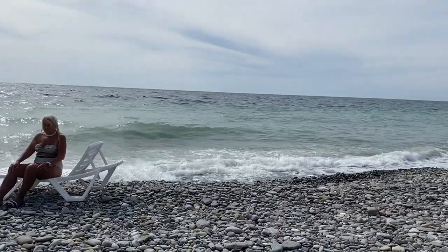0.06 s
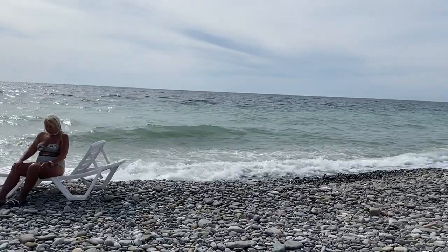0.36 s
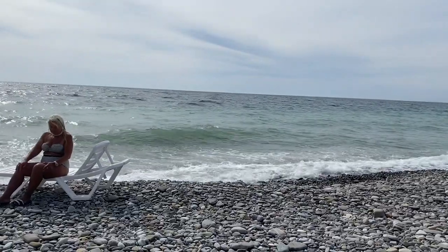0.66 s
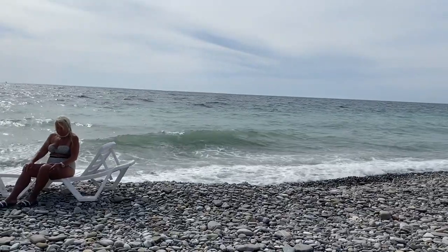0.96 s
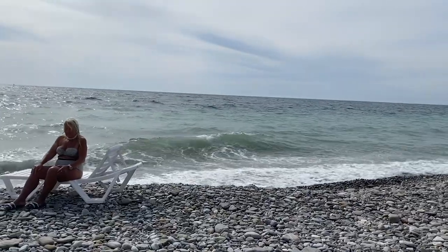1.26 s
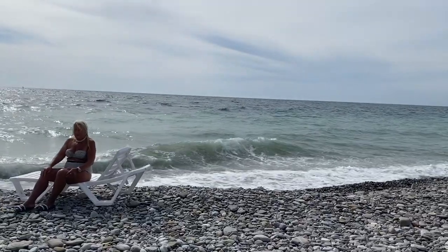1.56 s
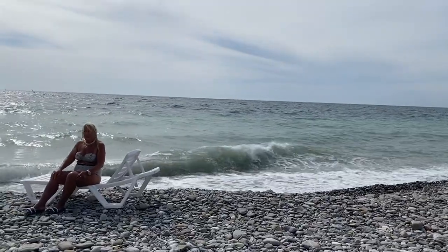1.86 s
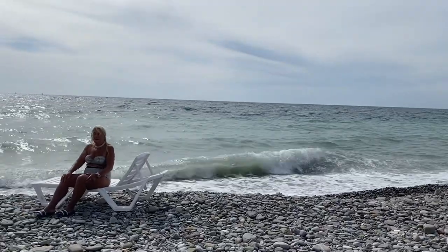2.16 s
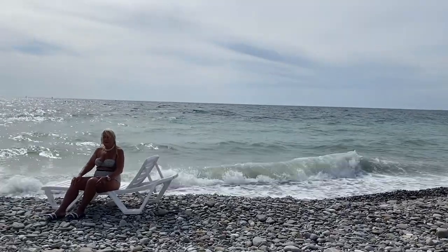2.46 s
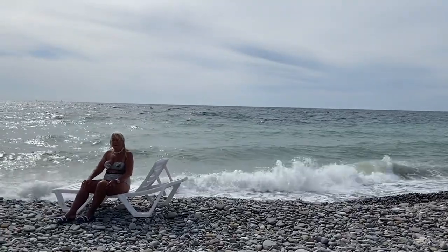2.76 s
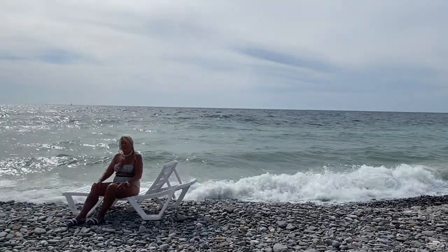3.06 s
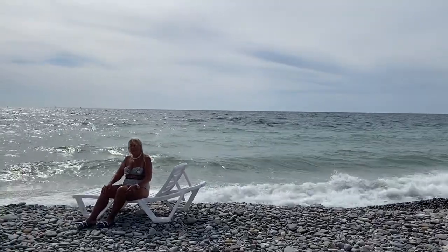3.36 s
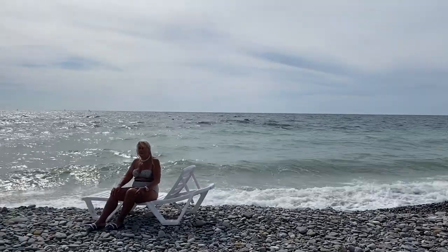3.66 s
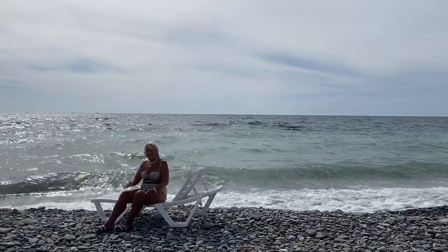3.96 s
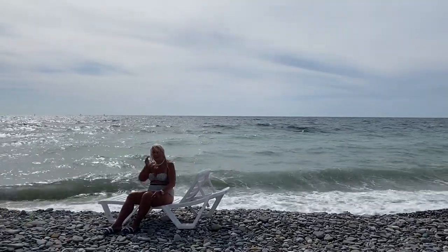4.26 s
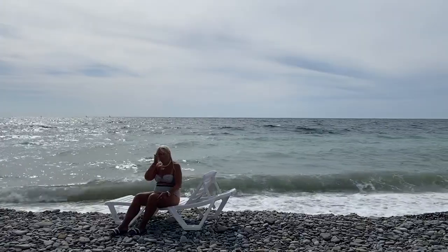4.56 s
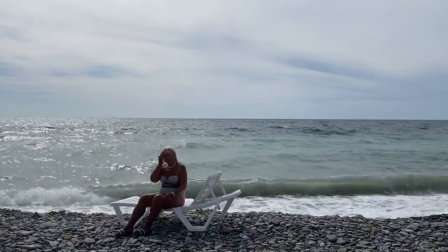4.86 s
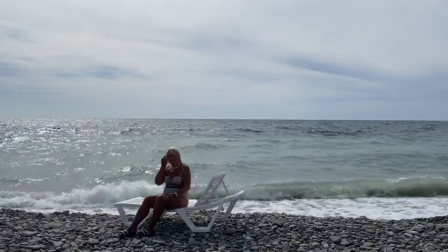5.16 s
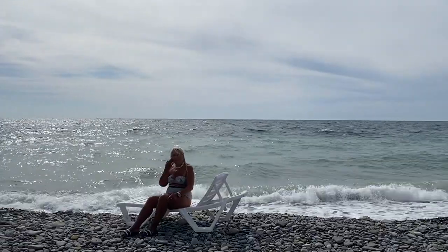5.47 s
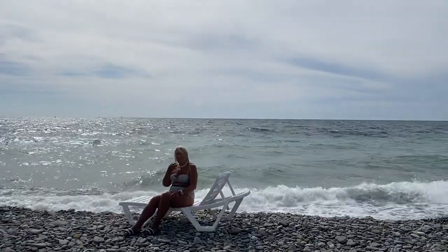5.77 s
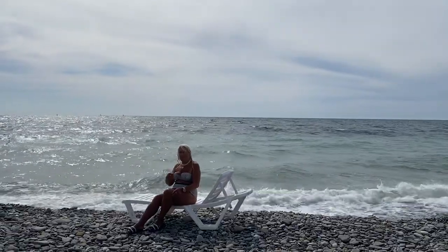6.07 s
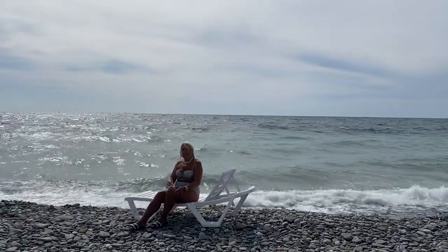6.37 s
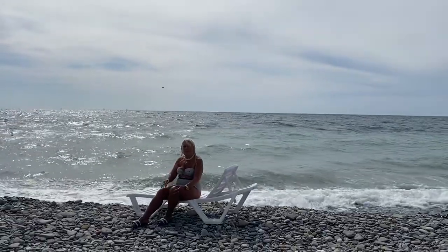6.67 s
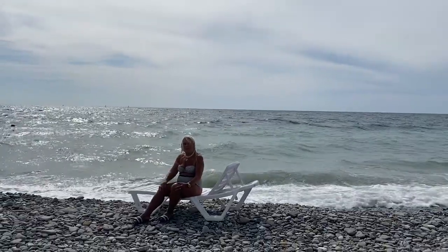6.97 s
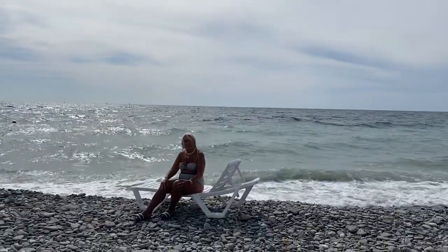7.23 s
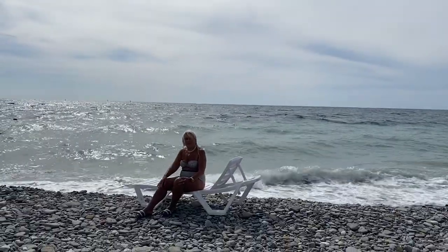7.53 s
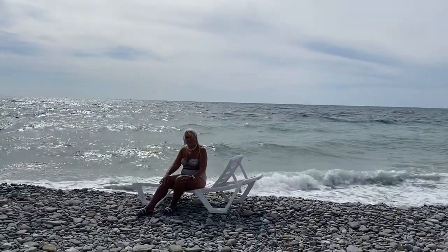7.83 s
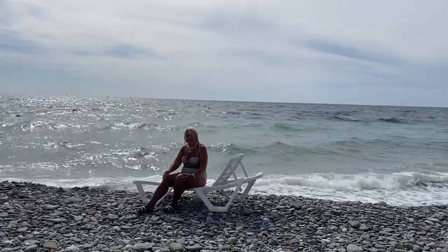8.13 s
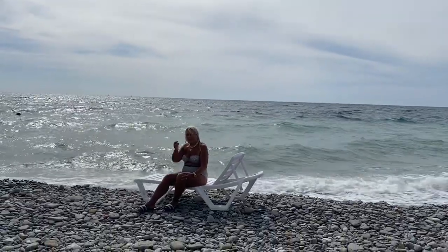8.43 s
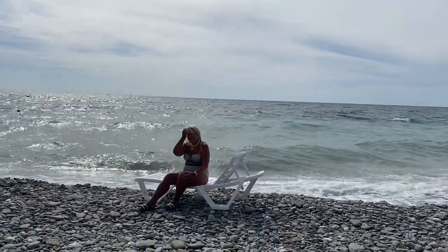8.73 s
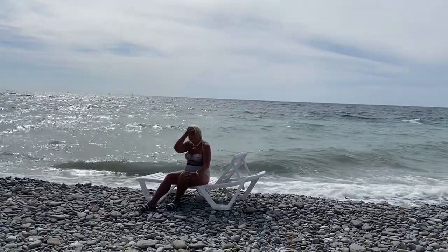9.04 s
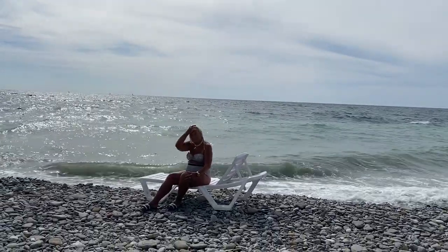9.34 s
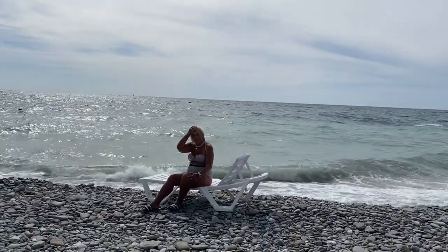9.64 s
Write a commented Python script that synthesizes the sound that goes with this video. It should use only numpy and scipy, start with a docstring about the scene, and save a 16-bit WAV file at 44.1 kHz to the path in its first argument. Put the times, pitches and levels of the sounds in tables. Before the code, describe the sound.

Wind buffets the microphone in uneven gusts as nearby surf surges up a stony shore, foam fizzing and pebbles clicking.

```python
"""Pebble beach in gusty wind

Small waves break a few metres away. Each breaker roars with bubbles, washes up the stones
and fizzes out as foam while pebbles click in the swash. Wind buffets the two microphone
ports: a steady rumble, lumpy eddies and now and then a hard thump."""
import sys
import numpy as np
from scipy import signal
from scipy.fft import rfft, irfft
from scipy.io import wavfile
from scipy.ndimage import uniform_filter1d, minimum_filter1d

SR = 44100
rng = np.random.default_rng(int(sys.argv[2]) if len(sys.argv) > 2 else 0)


def wav_out(sig):
    """Save sig, one row per channel (or a flat mono array), as 16-bit PCM at SR to the path in sys.argv[1]."""
    wavfile.write(sys.argv[1], SR, np.round(np.clip(np.atleast_2d(sig).T, -1, 1) * 32767).astype(np.int16))


N = 436590
TIME_S = np.arange(N) / SR
FREQS_HZ = np.maximum(np.fft.rfftfreq(N, 1 / SR), 1)
SIDE_SIGN = np.array([[1], [-1]])  # left, right


def from_db(db):
    """Decibels to gain."""
    return 10 ** (np.asarray(db) / 20)


def unit_rms(x):
    """Scale to an rms of 1."""
    return x / np.sqrt(np.mean(x ** 2) + 1e-20)


def over_time(rows):
    """Each column of a time table at every sample."""
    times_s, *columns = np.transpose(rows)
    return [np.interp(TIME_S, times_s, column) for column in columns]


def over_frequency(rows):
    """A frequency table at every FFT bin, interpolated on a log axis."""
    hz, values = np.transpose(rows)
    return np.interp(np.log(FREQS_HZ), np.log(hz), values)


def drift(rate_hz):
    """Smooth random wander, rms 1."""
    step, settle = 20, 2000
    pole = np.exp(-2 * np.pi * rate_hz * step / SR)
    noise = rng.standard_normal(N // step + settle + 2)
    slow = signal.lfilter([1], [1, -2 * pole, pole * pole], noise)[settle:]
    return np.interp(np.arange(N) / step, np.arange(len(slow)), unit_rms(slow))


def stereo_noise(spectrum, coherence):
    """Coloured noise partly shared by the ports, falling steeply beyond its spectrum; rms 1."""
    mid, side = rfft(rng.standard_normal((2, N)))
    alike = np.clip(over_frequency(coherence), -1, 1)
    pair = np.sqrt(1 + alike) * mid + np.sqrt(1 - alike) * side * SIDE_SIGN
    low_hz, high_hz = spectrum[0][0], spectrum[-1][0]
    skirts = np.minimum(1, np.minimum(FREQS_HZ / low_hz, high_hz / FREQS_HZ)) ** 4
    return unit_rms(irfft(pair * skirts * from_db(over_frequency(spectrum)), N))


def gust_envelope(start_s, length_s, rise_s=0.024, fall_s=0.022):
    """A gust or lull: quick rise, hold, quick fall."""
    corners_s = np.cumsum([start_s - rise_s / 2, rise_s, max(length_s - rise_s / 2, 0), fall_s])
    return np.interp(TIME_S, corners_s, [0, 1, 1, 0])


# Breeze between gusts: time_s, strength_db, big_whirls_db, small_whirls_db
BREEZE = [(0, -27.5, -9.5, -5.5), (1.7, -27.5, -7.5, -9), (3.0, -25, -12, -8.5), (4.6, -26, -9.5, -8.5),
          (5.3, -27.5, -14, -8), (6.0, -27, -11, -8.5), (6.8, -32.5, -13, -10), (7.7, -29.3, -10, -9),
          (8.7, -30, -14, -13), (9.9, -30, -9, -1)]
# Drops in the breeze: start_s, length_s, depth_db
LULLS = [(0.37, 0.062, 13), (1.219, 0.088, 19), (1.86, .04, 6), (2.284, 0.06, 5), (2.896, 0.038, 6),
         (3.092, 0.065, 5), (4.29, .025, 7), (4.398, 0.022, 5), (4.97, .03, 7), (5.415, .025, 8),
         (6.098, .02, 7), (6.655, 0.18, 10), (7.295, .04, 7), (7.62, 0.04, 10), (8.21, .13, 4),
         (9.23, 0.19, 7.5), (9.858, 0.096, 15)]
# Gusts: start_s, length_s, strength_db, big_whirls_db, small_whirls_db
GUSTS = [(0.11, .2, -23.5, -9.5, -4), (0.468, 0.065, -19.5, -7.5, 0), (0.563, 0.07, -23, -7, -5.5),
         (0.698, 0.26, -22, -9.5, -6.5), (0.961, 0.135, -21.3, -7.8, -3.5), (1.354, 0.144, -24, -5, 0),
         (1.489, 0.11, -21, -4, -4.5), (1.928, 0.14, -20, -8.5, -4), (2.088, .12, -21, -4.5, -7.5),
         (2.401, 0.11, -19.5, -9, -6.5), (2.52, .1, -23, -9, -9), (2.71, .13, -24.5, -8.5, -4.5),
         (3.177, 0.069, -19.5, -7.5, -12), (3.283, 0.048, -17.3, -7.5, -3.5), (3.405, 0.136, -27, -5.7, -4),
         (3.845, .2, -24.5, -12, -7.5), (4.127, 0.15, -24.5, -9, -3), (5.01, 0.097, -23, -10.5, -11),
         (5.765, 0.12, -22, -11, -12), (6.31, 0.13, -18.5, -10, -7.5), (7.104, 0.07, -23.5, -17, -8),
         (7.355, 0.19, -21.8, -9.5, -6), (7.675, 0.12, -23, -12, -11), (8.383, 0.055, -22.5, -12.5, -12),
         (8.546, 0.13, -24.5, -12, -9), (8.93, 0.1, -17.2, -8.5, -8), (9.052, 0.12, -22, -9.5, -9),
         (9.417, 0.054, -22.5, -11, -20), (9.766, 0.048, -21, -8.5, -4.5)]
def airflow(front_db=3.5, front_s=0.023, restless_db=1.1):
    """Wind strength and whirl weights in dB; each gust overrides the breeze, hardest at its front."""
    air = np.array(over_time(BREEZE))
    air[0] -= sum(depth_db * gust_envelope(start_s, length_s) for start_s, length_s, depth_db in LULLS)
    for start_s, length_s, *gust_db in GUSTS:
        share = gust_envelope(start_s, length_s)
        air += share * (np.array(gust_db)[:, None] - air)
        air[0] += front_db * share * np.exp(-np.abs(TIME_S - start_s) / front_s)
    air[0] += restless_db * drift(rate_hz=30)
    return air


# Wind likeness at the ports: freq_hz, correlation
WIND_COHERENCE = [(60, 0.95), (130, 0.86), (250, 0.74), (450, 0.47), (800, 0.6), (1500, 0.5)]
def turbulence(spectrum, swell_db, span_s):
    """Pressure noise swelling with each eddy, levelled over span_s so the faster lumps remain."""
    pressure = from_db(swell_db) * stereo_noise(spectrum, WIND_COHERENCE)
    span = int(span_s * SR)
    power = uniform_filter1d(uniform_filter1d(np.mean(pressure, axis=0) ** 2, span), span)
    return pressure / np.sqrt(np.abs(power) + 1e-9)


# Wind from the left, then head-on: time_s, left_minus_right_db
WIND_SIDE = [(0, 6), (.5, 11), (1.5, 10), (2.4, 4), (3.4, 1)]
def lee(pressure, corner_hz=680):
    """In wind from the left, the finest whirls miss the sheltered right port."""
    side_db, = over_time(WIND_SIDE)
    fine = irfft(rfft(pressure) / (1 + (corner_hz / FREQS_HZ) ** 10), N)
    gains = from_db(side_db / 2 * SIDE_SIGN)
    gains /= np.sqrt(np.mean(gains ** 2, axis=0))
    return pressure + (gains - 1) * fine


# Whirl spectra, biggest to finest: freq_hz, density_db
RUMBLE_SPECTRUM = [(20, -42), (32, -13), (50, -3), (80, 2), (110, -1.5), (170, -5.5), (240, -16.5),
                   (400, -50)]
BUFFET_SPECTRUM = [(80, -15.5), (130, -8), (190, -0.3), (300, -1), (440, -2.5), (600, -13.5), (900, -36),
                   (1500, -75)]
FLUTTER_SPECTRUM = [(300, -31), (480, 0), (620, 0), (800, -4.5), (1050, -15), (1500, -34.5), (2500, -55),
                    (5000, -65)]
RASP_SPECTRUM = [(700, -8), (1050, 13), (1700, 1.5), (2600, -14), (5000, -70)]
# Air tearing off a port's rim: centre_s, buffet_lift_db
FLAPS = [(3.364, 8.5), (3.419, 12.5), (3.456, 12), (3.51, 10.5), (3.537, 10.5), (3.662, 5.5), (4.329, 6),
         (4.725, 5), (4.945, 6), (5.222, 6), (5.372, 6), (5.49, 8), (5.975, 6), (6.07, 6.5), (6.49, 6),
         (6.955, 8), (7.262, 11), (7.905, 10), (8.48, 11), (9.605, 5)]
# Weak flow sputters, strong flow evens out: flutter_db, lump_depth
LUMPINESS = [(-34, 1.15), (-24, .65)]
def wind(flap_half_s=0.012, flap_harshness=1.3):
    """Big whirls rumble even in a lull; small ones burst, flap and merge into a rasp in hard gusts."""
    strength_db, big_db, small_db = airflow()
    flap_db = sum(db * np.exp(-(np.abs(TIME_S - centre_s) / flap_half_s) ** 3) for centre_s, db in FLAPS)
    flutter_db = strength_db + small_db + flap_harshness * flap_db
    lump_depth = np.interp(flutter_db, *np.transpose(LUMPINESS))
    eddies = lump_depth * drift(rate_hz=48)
    shreds = drift(rate_hz=110)
    rumble = turbulence(RUMBLE_SPECTRUM, 1.66 * eddies + 2.4 * drift(rate_hz=8.3), span_s=0.054)
    buffet = turbulence(BUFFET_SPECTRUM, 3.96 * eddies + 1.43 * drift(rate_hz=98), span_s=0.063)
    flutter = turbulence(FLUTTER_SPECTRUM, 2.6 * eddies + 4.2 * lump_depth * shreds, span_s=0.078)
    rasp = turbulence(RASP_SPECTRUM, 1.6 * eddies + 7.0 * shreds, span_s=0.054)
    rumble *= from_db(0.57 * strength_db + big_db + 0.4)
    buffet *= from_db(strength_db + flap_db - 0.7)
    flutter *= from_db(flutter_db - 2.25)
    rasp *= from_db(flutter_db + 1.5 * big_db - 5.7)
    return lee(rumble + buffet + flutter + rasp)


# Hard eddies: start_s, relative_db, swing_hz
THUMPS = [(.648, -6, 140), (1.128, -3, 80), (1.487, -2.5, 126), (1.553, -4, 135), (1.575, -1, 210),
          (1.583, 0, 100), (1.765, -6, 85), (1.995, -1, 265), (2.415, -2, 286), (2.756, -4, 293),
          (3.28, -5, 298), (3.47, -6, 85), (3.787, -6, 242), (4.036, -4, 272), (4.324, 1.5, 300),
          (4.361, -6.5, 336), (5.044, -7, 80), (5.809, -4, 280), (6.283, -3, 234), (6.38, 4, 286),
          (6.387, -1, 286), (6.416, 3.5, 290), (6.439, -3, 330), (6.465, -8, 80), (7.258, -6, 260),
          (8.473, -5.5, 400), (8.963, -1, 303), (9.157, -7, 320), (9.774, -4, 290)]
def thumps(swell_turns=0.83, gain_db=-4.2, slap_ratio=2.3, slap_db=-9, skew_rad=0.45):
    """An eddy slaps the ports slightly out of step and rocks the pressure for two or three swings."""
    out = np.zeros((2, N))
    age_s = np.arange(SR // 10) / SR
    for (start_s, relative_db, swing_hz), skew in zip(THUMPS, rng.standard_normal(len(THUMPS))):
        start = int(start_s * SR)
        for hz, part_db in ((swing_hz, 0), (slap_ratio * swing_hz, slap_db)):
            turns = hz * age_s
            swell = turns / swell_turns
            envelope = from_db(relative_db + gain_db + part_db) * swell ** 2 * np.exp(2 - 2 * swell)
            swing = envelope * np.sin(2 * np.pi * turns + skew_rad * skew * SIDE_SIGN)
            out[:, start:start + len(age_s)] += swing[:, :N - start]
    return out


# Big bubbles in the backwash: start_s, pitch_hz
GURGLES = [(6.64, 860), (6.65, 1020), (6.675, 1310)]
def gurgles(level_db=-42, swell_s=0.022, rise_per_s=2.2):
    """Each bubble swells, rings and climbs in pitch as it nears the surface."""
    out = np.zeros(N)
    for start_s, pitch_hz in GURGLES:
        age_s = np.maximum(TIME_S - start_s, 0)
        turns = np.cumsum(pitch_hz * (1 + rise_per_s * age_s)) / SR
        envelope = age_s / swell_s * np.exp(1 - age_s / swell_s)
        out += envelope * np.sin(2 * np.pi * turns)
    return from_db(level_db) * out


# Plunging crests: centre_s, half_length_s, pitch_hz, level_db
SPILLS = [(1.34, 0.027, 1750, -41), (1.65, .25, 2000, -45), (1.8, 0.22, 3800, -43.3),
          (2.17, .09, 3500, -46), (4.7, .02, 6300, -44.5), (4.76, 0.25, 2200, -43.5),
          (4.926, .03, 2450, -39.5), (5.3, .2, 950, -39), (9.62, 0.4, 2720, -45)]
def spills(edge_ratio=1.24, tumble_db=1.2):
    """A curling crest sheds drops and traps like-sized bubbles: a short, narrow-band, tumbling rush."""
    out = np.zeros((2, N))
    tumble = from_db(tumble_db * drift(rate_hz=14))
    for centre_s, half_length_s, pitch_hz, level_db in SPILLS:
        band = signal.butter(2, [pitch_hz / edge_ratio, pitch_hz * edge_ratio], "band", fs=SR, output="sos")
        shared, *per_port = rng.standard_normal((3, N))
        rush = unit_rms(signal.sosfilt(band, shared + per_port))
        out += from_db(level_db) * np.exp(-((TIME_S - centre_s) / half_length_s) ** 2) * rush
    return out * tumble


def ring(clicks, hz, t60_s):
    """A unit click starts a decaying sine of height 1."""
    pole, step_rad = from_db(-60 / (t60_s * SR)), 2 * np.pi * hz / SR
    return signal.lfilter([0, np.sin(step_rad)], [1, -2 * pole * np.cos(step_rad), pole ** 2], clicks + 1e-18)


def grains(per_s, low_hz, high_hz, t60_cycles, spread_db=3.0, pitches=28):
    """Tiny rings of random size, pitch and place; rms 1."""
    out = np.zeros((2, N))
    when, size, pitch, pan, sign = rng.random((int(per_s * N / SR), 5)).T
    height = np.sign(sign - 0.5) * from_db(spread_db * np.minimum(-np.log(1 - size), 5))
    for k, hz in enumerate(np.geomspace(low_hz, high_hz, pitches)):
        chosen = (pitch * pitches).astype(int) == k
        clicks = np.zeros((2, N))
        clicks[:, (when[chosen] * N).astype(int)] = height[chosen] * np.sqrt([pan[chosen], 1 - pan[chosen]])
        out += ring(clicks, hz, t60_cycles / hz)
    return unit_rms(out)


# Surf likeness at the ports: freq_hz, correlation
SURF_COHERENCE = [(150, 0.7), (600, 0.45), (1500, 0.55), (2050, 0.15), (2600, 0.38), (4200, 0.52),
                  (5600, 0.087), (7000, 0.75), (8500, 1)]
def bubble_cloud(spectrum, churn_db, waver_db):
    """Countless bubbles merge into noise that wavers as the water tumbles."""
    return stereo_noise(spectrum, SURF_COHERENCE) * from_db(churn_db + waver_db * drift(rate_hz=29))


# Waves: start_s, build_s, crash_delay_s, run_up_s, base_drain_s, strength_db, crash_weight
WAVES = [(0.0, .003, .02, .07, 0.45, -2, 0.44), (1.04, .04, .05, .03, 1.5, -7.5, .2),
         (1.28, .03, 0.023, 0.015, 0.2, -5, .2), (1.4, 0.16, .83, 1.045, 0.37, 0, 1),
         (4.26, 0.23, 0.92, 0.83, .8, 0.3, 0.97), (7.25, .06, 0.056, 0.041, 0.2, -8.5, 0.1),
         (7.54, 0.092, 0.5, 0.22, 1.1, -4, 0.14), (9.37, 0.05, .25, .5, .5, -3.5, 0.64)]
# Water rolling the stones back, and the roar of breakers farther along the beach: centre_s, half_length_s,
# roar_db, rattle_db
BACKWASH = [(.95, 0.85, -42, -55), (4.13, 0.34, -45.5, -53.5), (6.62, 0.15, -50, -51),
            (6.95, .35, -48, -66), (8.85, .7, -44.8, -49.8)]
def wave_level_db(law, backwash_db, crash_rise_s=0.17):
    """Level of one surf layer: each wave builds, crashes, runs up the beach and drains back."""
    calm_db, body_db, crash_db, crash_fade_s, drain_factor = law
    power = from_db(calm_db) ** 2
    for start_s, build_s, crash_delay_s, run_up_s, base_drain_s, strength_db, crash_weight in WAVES:
        age_s = TIME_S - start_s - crash_delay_s
        build = np.clip((TIME_S - start_s) / build_s, 0, 1)
        crash = np.exp(-np.maximum(age_s / crash_fade_s, -age_s / crash_rise_s))
        drained_db = 10 * np.maximum(age_s - run_up_s, 0) / (base_drain_s * drain_factor)
        wave_db = body_db + strength_db + crash_weight * crash_db * crash - drained_db
        power += (build * from_db(wave_db)) ** 2
    for (centre_s, half_length_s, *_), db in zip(BACKWASH, backwash_db):
        power += (from_db(db) * np.exp(-((TIME_S - centre_s) / half_length_s) ** 2)) ** 2
    return 10 * np.log10(power)


# Surf spectra: freq_hz, density_db
ROAR_SPECTRUM = [(80, 19), (250, 2.5), (500, 0), (950, 7), (1400, 1.5), (2000, 0.5), (2600, -5.5),
                 (3500, -22.5), (6000, -45)]
WASH_SPECTRUM = [(1500, -19), (2400, -2), (3100, 0.5), (4200, 0), (5300, -2.5), (6500, -10.5), (9000, -30)]
FIZZ_SPECTRUM = [(4000, -16), (5500, -1), (6600, 2.5), (8000, -1.5), (10500, -1.5), (13000, -3.5),
                 (16000, -5.5)]
# Layer response to a wave: calm_db, body_db, crash_db, crash_fade_s, drain_factor
ROAR_LAW = (-47, -41.5, 7.5, 0.84, 1.5)
WASH_LAW = (-51.5, -45.5, 4.5, 0.6, 0.9)
FIZZ_LAW = (-54.5, -45, 5, 0.74, 1.0)
def surf(backwash_fizz_db=-6):
    """Big bubbles roar in the breaker, the wash knocks pebbles together, the foam fizzes."""
    *_, backwash_roar_db, rattle_db = np.transpose(BACKWASH)
    churn = drift(rate_hz=8.7)
    bubbles = from_db(-10) * grains(per_s=600, low_hz=714, high_hz=2770, t60_cycles=51)
    pebbles = from_db(-11) * grains(per_s=980, low_hz=2260, high_hz=6350, t60_cycles=48)
    roar = bubble_cloud(ROAR_SPECTRUM, churn_db=0.66 * churn, waver_db=-0.17) + bubbles
    wash = bubble_cloud(WASH_SPECTRUM, churn_db=0.1 * churn, waver_db=1.0) + pebbles
    fizz = bubble_cloud(FIZZ_SPECTRUM, churn_db=0.5 * churn, waver_db=0.9)
    roar *= from_db(wave_level_db(ROAR_LAW, backwash_roar_db) + 5.5)
    wash *= from_db(wave_level_db(WASH_LAW, rattle_db))
    fizz *= from_db(wave_level_db(FIZZ_LAW, rattle_db + backwash_fizz_db) - 1.0)
    return roar + wash + fizz


def scene():
    """Surf in front, wind on the microphone."""
    return surf() + spills() + gurgles() + wind() + thumps()


def limiter(x, ceiling=0.86, hold_s=0.006):
    """The gain ducks smoothly for a few milliseconds around peaks above the ceiling."""
    hold = int(hold_s * SR)
    allowed_gain = 1 / np.maximum(np.abs(x).max(axis=0) / ceiling, 1)
    return x * uniform_filter1d(minimum_filter1d(allowed_gain, hold), hold)


# Port balance: freq_hz, left_minus_right_db
PORT_BALANCE = [(100, 0.5), (250, 0.7), (500, 3.3), (950, 1.8), (1900, 3.7), (5000, 2.4), (8500, -0.3),
                (16000, 0.5)]
# Phase lead of the right port, growing steadily through the treble: freq_hz, lead_turns
RIGHT_PORT_LEAD = [(0, 0), (170, 0), (400, -.06), (550, 0), (750, .14), (1650, .21), (1950, .2), (2200, 0),
                   (3200, -.1), (4200, 0), (5000, 0), (6200, -.13), (7100, 0), (9000, .5), (17000, 2.37)]
def record(dry, low_cut_hz=38, high_cut_hz=15850):
    """Two ports, unequal in level and timing, then low cut, limiter and steep high cut."""
    balance = from_db(over_frequency(PORT_BALANCE) / 2 * SIDE_SIGN)
    balance /= np.mean(balance, axis=0)
    lead_turns = np.interp(FREQS_HZ, *np.transpose(RIGHT_PORT_LEAD)) * np.array([[0], [1]])
    ports = irfft(rfft(dry) * balance * np.exp(2j * np.pi * lead_turns), N)
    low_cut = signal.butter(4, low_cut_hz, "high", fs=SR, output="sos")
    high_cut = signal.ellip(12, 0.1, 90, high_cut_hz, fs=SR, output="sos")
    return signal.sosfilt(high_cut, limiter(signal.sosfilt(low_cut, ports)))


dry = scene()
out = record(dry)
wav_out(out)
```